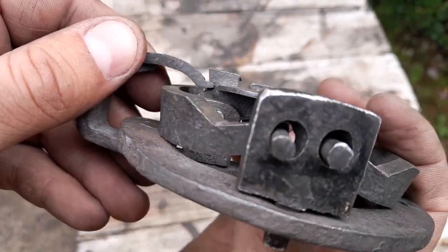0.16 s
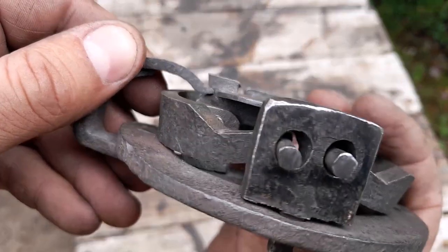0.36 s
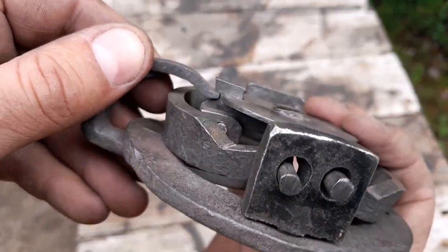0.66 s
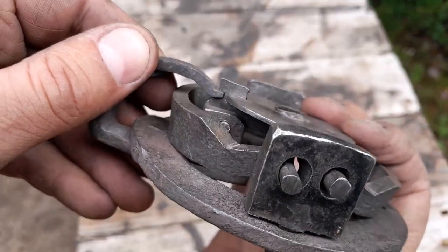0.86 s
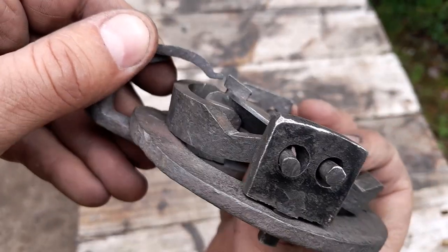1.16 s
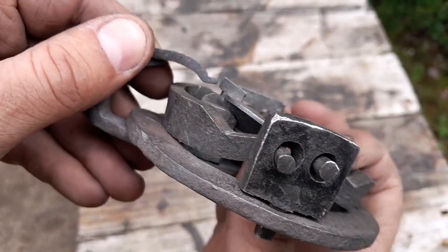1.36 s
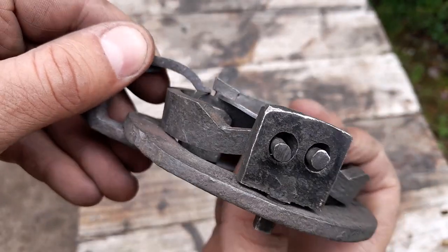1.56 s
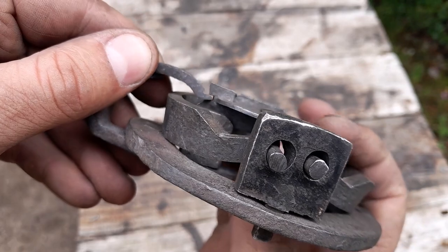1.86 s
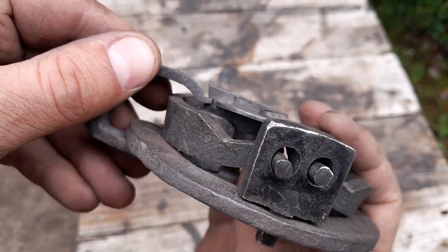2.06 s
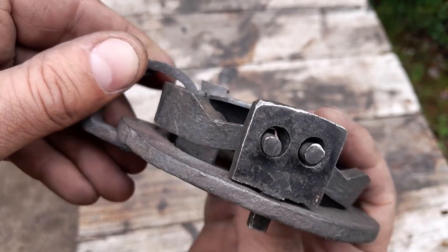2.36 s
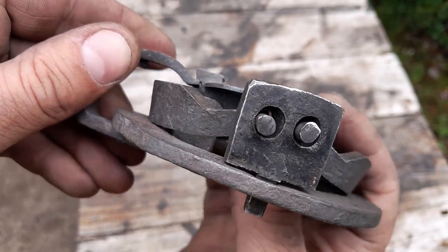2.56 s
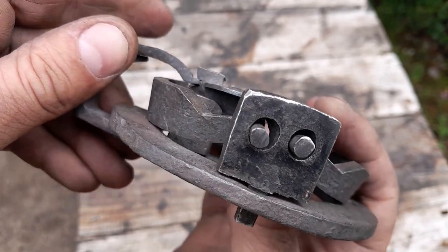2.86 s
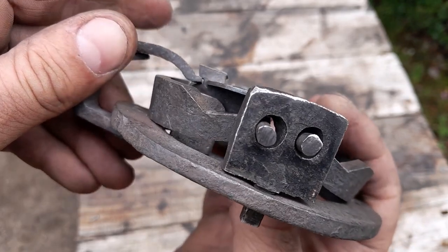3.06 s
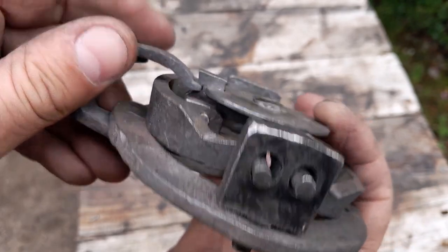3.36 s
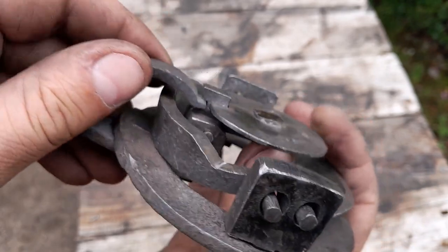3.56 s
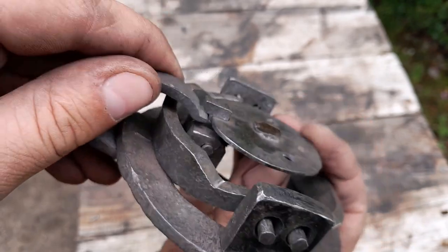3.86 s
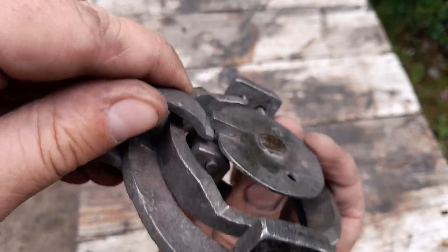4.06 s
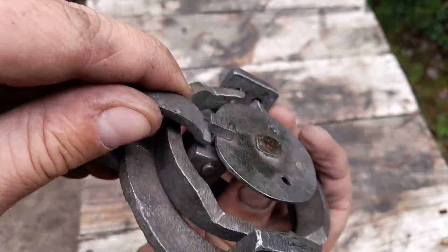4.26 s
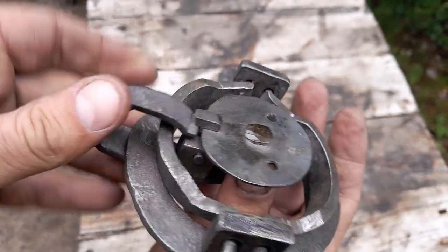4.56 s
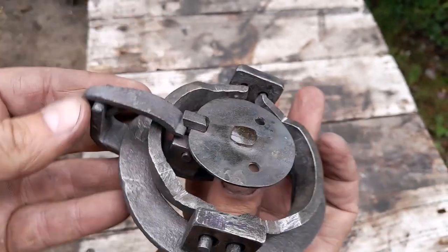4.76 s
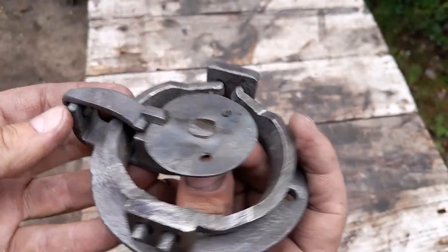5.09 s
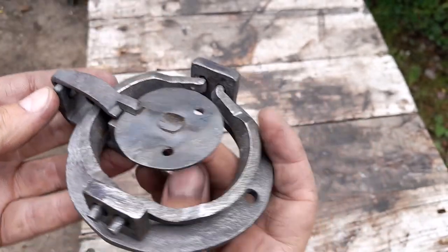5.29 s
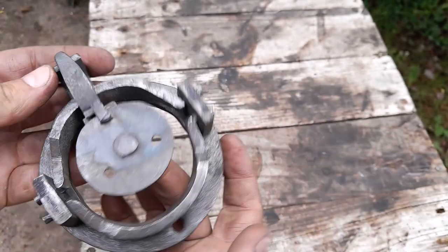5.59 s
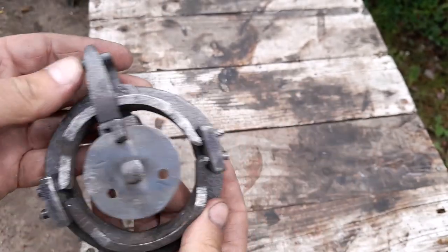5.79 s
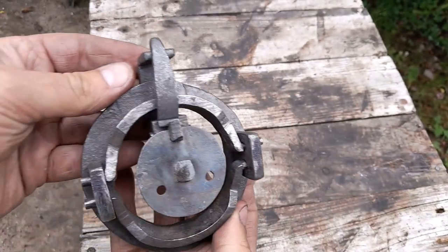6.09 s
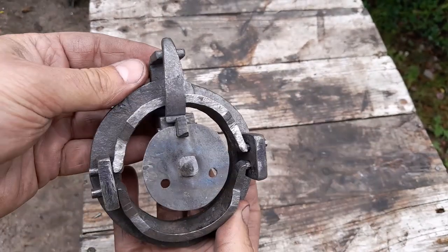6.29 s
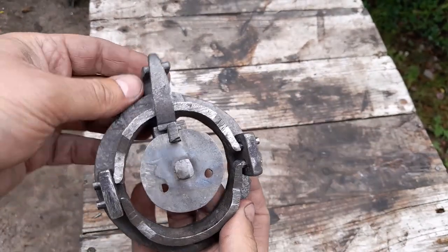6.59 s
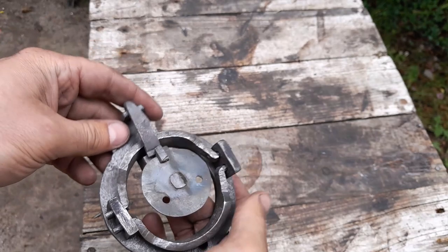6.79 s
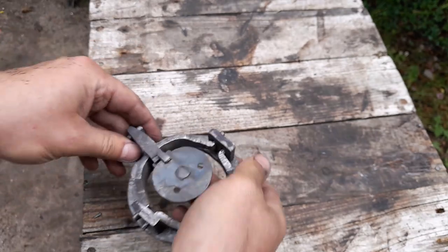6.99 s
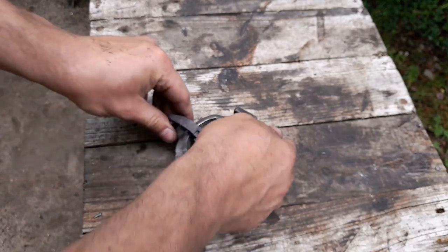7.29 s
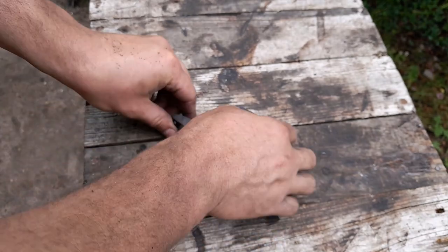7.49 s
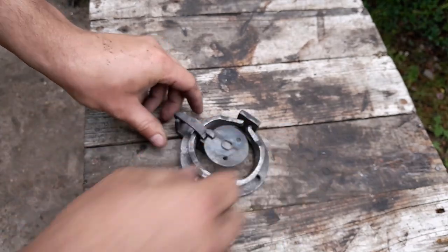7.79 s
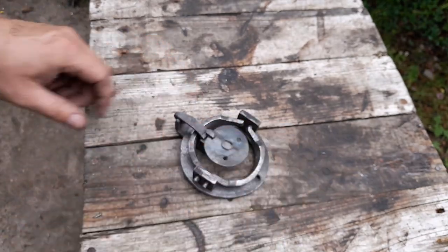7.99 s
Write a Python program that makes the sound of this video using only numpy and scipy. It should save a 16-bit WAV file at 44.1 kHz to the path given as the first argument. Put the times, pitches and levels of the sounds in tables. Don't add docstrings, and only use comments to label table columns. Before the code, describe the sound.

A quiet outdoor place with low distant traffic rumble and soft air, recorded close in stereo. Faint fluty thrush notes and far whistles occupy the first three seconds. At 1.0 s a short piercing hinge squeak at about 8 kHz comes with ticks, then light steel clicks to 1.3 s; thinner squeaks glide at 1.65, 1.77 and 1.9 s. At 2.49 s a jaw snaps hard, bright and very short. Small clicks follow around 3.6 and 3.95 s while a warbler chirps rapidly from 3.4 to 6.5 s. A hard, rattling plate blow hits at 4.92 s, and the loudest latch clack at 5.2 s. A weaker double click comes at 5.7 s. The thrush returns about 6.9 s. From 7.15 s an airy rush swells, peaking near 7.55 s as the steel lands, ringing, with low wooden thumps at 7.56 and 7.65 s and a last knock at 7.84 s.

```python
import sys
import numpy as np
from scipy import signal
from scipy.fft import rfft, irfft, next_fast_len
from scipy.io import wavfile
from scipy.ndimage import uniform_filter1d

SR = 44100
rng = np.random.default_rng(int(sys.argv[2]) if len(sys.argv) > 2 else 0)


def store_pcm(level_fs):
    pcm = np.round(np.clip(level_fs, -1, 1) * 32767).astype(np.int16)
    wavfile.write(sys.argv[1], SR, np.atleast_2d(pcm).T)


def volts_from_decibels(level):
    exponent = np.asarray(level, float) / 20
    return 10 ** exponent


N = 358974

PORT_LAG = 5
LEAD_RAD = 1.3


def unit(x):
    return x / np.sqrt(np.mean(x ** 2))


def band(x, lo_hz, hi_hz):
    return signal.sosfilt(signal.butter(2, [lo_hz, min(hi_hz, .45 * SR)], "band", fs=SR, output="sos"), x)


def add(out, x, s, pan_db, lag=PORT_LAG):
    for ch, side in enumerate((1, -1)):
        i = int(s * SR) + (1 - ch) * lag
        part = np.atleast_2d(x)[-ch, :N - i]
        out[ch, i:i + len(part)] += part * volts_from_decibels(side * pan_db / 2)


def echo(x, t60):
    t = np.arange(int(t60 * SR)) / SR
    tail = rng.standard_normal((2, len(t))) * volts_from_decibels(-60 * t / t60) * np.minimum(t / 0.0084, 1)
    tail = tail / np.sqrt(np.sum(tail ** 2, axis=1, keepdims=True))
    return signal.fftconvolve(x[None], tail, axes=1)[:, :N]


def walk(rate):
    hold = int(SR / rate)
    levels = np.repeat(rng.standard_normal(N // hold + 1), hold)
    return 1.3 * uniform_filter1d(levels, hold)[:N]


def ring(modes, length, scatter_db, chance, spread, lead=0):
    hz, db, t60 = np.transpose(modes)[:, :, None]
    strike, detune, turn = chance[:, :len(hz), None]
    t = np.arange(int(.25 * SR)) / SR
    gain = volts_from_decibels(db + scatter_db * strike - 60 * t / (t60 * np.clip(length, .1, 4)))
    wave = gain * np.exp(2j * np.pi * hz * (1 + 0.00054 * detune) * t)
    turned = wave * np.exp(1j * (lead + spread * turn))
    return np.array([wave.sum(axis=0), turned.sum(axis=0)]).imag


def tone(rows, octave_db=-52):
    s, hz, db = np.transpose(rows)[:3]
    t = np.arange(s[0], s[-1], 1 / SR)
    phase = 2 * np.pi * np.cumsum(np.interp(t, s, hz)) / SR
    edge = np.clip(np.minimum(t - s[0], s[-1] - t) / 0.00056, 0, 1)
    wave = np.sin(phase) + volts_from_decibels(octave_db) * np.sin(2 * phase)
    return np.sqrt(2) * edge * volts_from_decibels(np.interp(t, s, db)) * wave


def clicks(out, hits, modes, spot_db, crack_db, crack_s, rattle_s, rattle, spot_t60=0.034, tops_hz=None,
           spread=2.0, lead=0, damp_s=1):
    hard_db, hard_slope = -20, 0.81
    t = np.arange(int(.25 * SR)) / SR
    for k, (s, peak_db, spot_hz, pan_db, length) in enumerate(hits):
        chance = rng.standard_normal((3, 16))
        noise = rng.standard_normal((2, len(t)))
        struck = list(modes) + [(spot_hz, spot_db, spot_t60)]
        body = ring(struck, length, 1.5, chance, spread, lead) * (1 - np.exp(-t / 0.00025))
        decay = np.exp(-t / crack_s) + rattle * np.exp(-t / (rattle_s * length))
        crack = band((noise[0] + 1.4 * noise) * decay, 2600, 11000)
        crack = band(crack, 1100, tops_hz[k] if tops_hz else 20000)
        share = volts_from_decibels(crack_db - hard_slope * max(peak_db - hard_db, 0))
        hit = body / np.abs(body).max() + share * crack / np.abs(crack).max()
        level = volts_from_decibels(peak_db - 2200 * np.maximum(t - damp_s, 0))
        add(out, level * hit, s, pan_db, lag=0 if lead else PORT_LAG)



def jaws(out):
    jaw_modes = [(4650, -15, 0.028), (5860, 3, 0.033), (7290, -13.5, 0.0557), (7900, -11.5, 0.064),
                 (8340, -4.5, 0.075), (8600, -11, 0.0336), (8750, -24, 0.044), (10300, -26.5, 0.077),
                 (11850, -9.5, 0.087), (13500, -21.5, 0.047), (14300, -7.5, 0.077), (15150, -16, 0.083)]
    jaw_hits = [
        (1.199, -32.5, 4340, 5.5, 0.73),
        (2.3093, -54, 6800, 1.5, 1.5),
        (2.4109, -47.5, 8500, 6.5, 0.93),
        (2.557, -41, 8400, 2.5, 0.66),
        (4.897, -41.5, 8170, 15, 0.97),
        (4.907, -35, 8600, -11, 0.35),
    ]
    snap_modes = [(2740, -28.5, 0.04), (4310, -28, 0.036), (6130, -3, .036), (7700, -9.5, 0.02),
                  (8250, 1.5, 0.053), (9100, -11.5, 0.055), (9780, -10.5, 0.043), (10350, -16.5, 0.026),
                  (11830, -26, 0.052), (14370, 0.5, .045), (15480, -19, .065)]
    snap_hits = [
        (2.485, -10, 8400, 8, .9),
    ]
    clicks(out, jaw_hits, jaw_modes, spot_db=2.0, crack_db=3.5, crack_s=0.0035, rattle_s=.01, rattle=.15)
    clicks(out, snap_hits, snap_modes, spot_db=-8.0, crack_db=1.5, crack_s=0.002, rattle_s=0.013,
           rattle=0.16, spread=0.55, lead=LEAD_RAD)


def pan(out):
    pan_modes = [(2191, -23, .06), (3340, -28, .09), (3900, -9, .02), (6105, -13, .04), (7320, -7, .03),
                 (8250, -5, .05), (8645, -2, .035), (9430, -9, .07), (11720, -9, .06), (13370, -4, .04),
                 (13830, -6, .045), (15460, -13, .07), (10310, -10, .3), (14230, -13, .2)]
    pan_hits = [
        (4.923, -12.5, 7900, 4.9, 0.73),
    ]
    pan_rattles = [
        (4.9275, -25, 4667, 4, 1),
        (4.9335, -32, 6110, 4, .8),
        (4.936, -31, 9430, 4, 1),
        (2.4925, -27, 11830, 8, 1),
        (5.209, -33, 13190, 7, 1),
        (3.564, -53, 8280, 8, 1),
        (4.4605, -54, 8000, -2, 1),
        (7.563, -37, 4667, 3, 1),
    ]
    clicks(out, pan_hits, pan_modes, spot_db=2.5, crack_db=4.0, crack_s=.002, rattle_s=0.022, rattle=0.4,
           spot_t60=0.04, spread=0.47, lead=LEAD_RAD)
    clicks(out, pan_rattles, [], spot_db=.1, crack_db=-14, crack_s=.002, rattle_s=.01, rattle=.3,
           spot_t60=.06, spread=.3, lead=LEAD_RAD)


def latch(out):
    latch_modes = [(4450, -4, 0.022), (6800, -3, 0.028), (7935, .1, 0.03), (9744, -11, .04),
                   (11820, -20, .04), (13190, -10, .035), (14810, -11, .035), (2780, -27, .03)]
    latch_hits = [
        (4.4897, -42, 7940, -2, .8),
        (4.5783, -36, 4610, -2, .6),
        (5.2047, -7, 7300, 7.5, .8),
    ]
    clicks(out, latch_hits, latch_modes, spot_db=-13.0, crack_db=3.0, crack_s=0.0013, rattle_s=0.006, rattle=0.25)


def catch(out):
    catch_modes = [(2820, -20, .1), (4490, -9, .1), (5670, -12, .03), (7924, .1, .2), (8540, -14, .1),
                   (9685, -10, .06), (11670, -3, .12), (13160, -2, .1), (14790, -9, .06)]
    catch_hits = [
        (3.9535, -31, 9690, 2.1, .3),
        (5.696, -32.5, 7070, 5.7, 1.4),
        (5.7122, -37.5, 4280, 4.2, 0.47),
    ]
    clicks(out, catch_hits, catch_modes, spot_db=-4.0, crack_db=1, crack_s=0.0016, rattle_s=0.026,
           rattle=0.25, spot_t60=0.027, damp_s=.023)


def lever(out):
    lever_modes = [(4686, 0, 0.015), (6170, 3, 0.013), (8305, 2.5, 0.063), (10320, -14, 0.08),
                   (11770, -3.5, 0.068), (14330, -4, 0.055), (16300, -20, 0.067)]
    lever_hits = [
        (1.0975, -36, 8260, 9, 0.8),
        (1.1349, -26.5, 5860, 4, 0.52),
        (1.135, -37, 10560, 6, 2.1),
        (1.3273, -43, 8340, 6.3, 1.7),
        (2.329, -48.5, 14300, 5.3, 1.8),
        (3.6256, -29, 8200, 8.5, 1.56),
    ]
    clicks(out, lever_hits, lever_modes, spot_db=4.0, crack_db=-7.0, crack_s=0.0069, rattle_s=0.01, rattle=0.17)


def base(out):
    base_modes = [(2800, -17, .03), (4667, -8, .1), (6000, -9, .05), (7030, -9, .04), (7348, -9, .05),
                  (8215, -5, .05), (8570, -1, .06), (9400, -11, .05), (10305, -9, .25), (11720, -9, .15),
                  (14180, -2, .13), (15490, -11, .08)]
    base_hits = [
        (7.4882, -33, 10305, 3.2, 0.53),
        (7.5605, -25, 4667, 1.9, 1),
        (7.656, -26, 7500, 2.5, 0.36),
    ]
    # t/s, t60/s, level/dB
    settles = [
        (7.558, 0.25, -38),
        (7.656, 0.14, -38),
    ]
    clicks(out, base_hits, base_modes, spot_db=-12.0, crack_db=1.5, crack_s=0.0011, rattle_s=0.018,
           rattle=0.27, spot_t60=0.16, spread=0.78, lead=LEAD_RAD)
    t = np.arange(SR // 4) / SR
    for s, t60, db in settles:
        grit = rng.standard_normal((2, len(t))) * volts_from_decibels(db - 60 * t / t60)
        add(out, band(grit, 640, 9500), s, 3)


def ticks(out):
    # t/s, peak level/dB, f/Hz, left minus right level/dB, top of the crack f/Hz
    light_ticks = [(0.688, -58, 8000, -5, 8000), (0.9954, -55.5, 3380, 26, 7100),
                   (1.0084, -40, 3250, 3, 6040), (1.0933, -54, 8320, 9, 12900),
                   (1.1142, -46, 2980, 3, 6960), (1.6132, -39.5, 7000, 3.5, 9900),
                   (1.622, -42, 7900, -10, 7450), (3.6167, -44.5, 7700, -3.5, 8450),
                   (3.748, -62, 8250, 4, 8800), (3.8986, -50.5, 10000, 6.5, 8950),
                   (4.008, -56.5, 6400, 3, 12000), (4.1454, -44, 3790, -0.5, 7900),
                   (4.46, -54.5, 7740, -4, 9260), (4.576, -45.5, 4580, -6, 9000),
                   (5.957, -65.5, 8300, 1, 12000), (6.227, -44, 4330, 3.5, 7100),
                   (7.6463, -46.5, 7000, 2.5, 8000)]
    hits = [(*row[:-1], 0.68) for row in light_ticks]
    tops_hz = [row[-1] for row in light_ticks]
    clicks(out, hits, [], tops_hz=tops_hz, spot_db=.1, crack_db=10.5, crack_s=0.000414, rattle_s=0.017, rattle=0.2)


def squeaks(out):
    # t/s, f/Hz, level/dB
    hinge_squeaks = [
        [(.995, 8000, -54), (.999, 7920, -38), (1.0035, 7880, -17.5), (1.006, 7870, -18.5), (1.013, 7868, -33),
         (1.019, 7868, -50), (1.06, 7890, -72)],
        [(1.647, 7150, -64), (1.653, 7160, -42), (1.664, 7190, -36), (1.675, 7205, -40), (1.685, 7220, -50),
         (1.7, 7237, -66), (1.73, 7240, -80)],
        [(1.753, 7400, -64), (1.762, 7300, -46), (1.7645, 7250, -60), (1.7695, 7120, -32), (1.783, 7060, -28),
         (1.791, 7030, -32), (1.8, 7030, -45), (1.812, 7050, -60), (1.85, 7060, -80)],
        [(1.913, 7100, -75), (1.919, 6820, -45), (1.923, 6820, -52), (1.927, 6820, -76)],
    ]
    octaves_db = (-30, -16, -17, -32)
    for rows, pan_db, octave_db in zip(hinge_squeaks, (8.5, -1.0, 3.5, 13.0), octaves_db):
        add(out, tone(rows, octave_db), rows[0][0], pan_db)


def rubs(out):
    # t/s, length/s, level/dB, top f/Hz
    finger_rubs = [
        (5.36, .06, -57, 14000),
        (2.31, .045, -62, 10000),
        (4.46, .05, -63, 14000),
        (1.762, .05, -56, 7500),
        (.99, .03, -49, 13000),
        (1.785, .06, -58, 6000),
        (7.638, .016, -48, 8000),
        (1.91, .025, -60, 14000),
        (1.648, .03, -58, 8000),
    ]
    for s, length, db, top_hz in finger_rubs:
        grit = rng.standard_normal(SR // 2)[:int(length * SR)]
        add(out, volts_from_decibels(db) * band(grit * np.hanning(len(grit)), 1100, top_hz), s, 3)


def knocks(out):
    # f/Hz, level/dB, t60/s
    plank_modes = [(117, -18, 0.4), (156, -7.5, 0.088), (200, -6.5, 0.04), (322, -0.5, 0.021),
                   (352.5, 1.5, .07), (523, -1, 0.045), (688, -3, 0.067), (875, -5, 0.049),
                   (1075, 0.5, 0.04), (1428, -18, 0.02)]
    # t/s, peak level/dB, push/ms, ring length factor, level of the low modes/dB
    thumps = [
        (4.9228, -42, 0.62, 0.29, -12),
        (2.486, -34, 0.49, 0.2, 8),
        (5.2053, -31.5, .2, 0.084, 0),
        (7.5564, -19, 1.07, 0.91, 14.5),
        (7.581, -28, 4.8, 0.79, -27),
        (7.6489, -21.5, 1.22, 0.27, -21),
        (7.6546, -24, 2.1, 1, 4.5),
        (7.6745, -27, 1.7, 0.81, -4),
        (7.8415, -26, 1.66, 0.6, -9),
    ]
    boom_hz, rise_s, thud_db, thud_s = 260, 0.00069, 1.5, 0.039
    for s, peak_db, push_ms, length, boom_db in thumps:
        push = np.hanning(int(np.clip(push_ms, .2, 8) * SR / 1000))
        wood = [(hz, db + boom_db * (hz < boom_hz), t60) for hz, db, t60 in plank_modes]
        knock = ring(wood, length, 3, rng.standard_normal((3, 16)), spread=0)[0]
        t = np.arange(len(knock)) / SR
        knock += volts_from_decibels(thud_db) * rng.standard_normal(len(t)) * np.exp(-t / (thud_s * length))
        knock = np.convolve(-knock * (1 - np.exp(-t / rise_s)), push)
        knock = band(knock, 110, 2300)
        add(out, volts_from_decibels(peak_db) * knock / np.abs(knock).max(), s, 3.5)


def trap():
    out = np.zeros((2, N))
    for part in (jaws, pan, latch, catch, lever, base, ticks, squeaks, rubs, knocks):
        part(out)
    shade = 0.026
    out[1] = signal.lfilter([1 - shade], [1, -shade], out[1])
    near_t60_s, near_db = 0.18, -22.5
    return out + volts_from_decibels(near_db) * echo(band(out.mean(axis=0), 1200, 22000), near_t60_s)


def sweep():
    # t/s, level/dB
    sweep_level = [(7.12, -96), (7.141, -86), (7.3, -75.5), (7.5, -67), (7.57, -75), (7.7, -91),
                   (7.9, -67.5), (8.05, -70), (8.14, -70)]
    sweep_hz = (2825, 9500)
    db = np.interp(np.arange(N) / SR, *np.transpose(sweep_level)) + 1.8 * walk(30)
    return volts_from_decibels(db) * unit(band(rng.standard_normal((2, N)), *sweep_hz))


def thrush():
    # t/s, length/s, f/Hz, level/dB
    held = [(.85, .03, 2280, -66), (.86, .09, 1830, -72), (1.03, .08, 2150, -75), (1.135, .02, 2520, -64),
            (1.165, .05, 2560, -62), (1.51, .02, 1850, -66), (1.63, .065, 2330, -67),
            (1.715, .05, 2360, -71), (1.74, .06, 1850, -71), (1.82, .03, 2480, -68), (2.05, .12, 2270, -70),
            (2.62, .04, 2160, -71), (1.38, .03, 1830, -68), (6.905, .035, 2250, -65),
            (6.96, .045, 2250, -63), (7.05, .055, 2230, -69), (7.14, .095, 2330, -61),
            (7.24, .09, 2250, -68), (7.8, .1, 1920, -69)]
    # t/s, length/s, first f/Hz, aim f/Hz, level/dB
    glides = [(1.215, .033, 2450, 1700, -66), (1.325, .025, 1450, 1880, -65),
              (1.415, .025, 1950, 1500, -63), (1.47, .125, 2200, 2350, -62), (1.59, .035, 2080, 1750, -69),
              (2.3, .055, 2350, 2250, -66), (2.515, .09, 1850, 2250, -64), (7.005, .07, 2150, 1800, -66),
              (2.612, .12, 2430, 2510, -66), (2.72, .04, 2130, 2400, -70), (7.42, .14, 1520, 2000, -64),
              (7.67, .12, 1850, 1960, -61)]
    scoops = [
        (.705, .14, 2570, 2280, -63),
        (7.79, .07, 2000, 2640, -62),
        (7.945, .05, 1850, 2350, -62),
        (8.02, .115, 1850, 2330, -62),
    ]
    dips = [
        (.48, .125, 1880, 1770, -68),
        (1.352, .04, 1880, 1600, -66),
        (1.535, .045, 1900, 1580, -68),
    ]
    notes = [(s, length, hz, length / 2, hz, hz, db) for s, length, hz, db in held]
    notes += [(s, length, first, length / 2, (first + aim) / 2, aim, db) for s, length, first, aim, db in glides]
    notes += [(s, length, first, .033, aim, aim, db) for s, length, first, aim, db in scoops]
    notes += [(s, length, first, length / 2, aim, first, db) for s, length, first, aim, db in dips]
    out = np.zeros((2, N))
    for s, length, first, turn_s, turn, last, db in notes:
        add(out, tone([(0, first, db - 2), (turn_s, turn, db + 5.5), (length, last, db - 2)]), s, 3)
    return out * volts_from_decibels(.2)


def warbler():
    # t/s, f/Hz, level/dB
    chiff = [(0, 7100, -7), (.005, 6200, 2), (.011, 5200, 1), (.019, 4680, -1), (.05, 4600, 1),
             (.072, 4560, -3), (.085, 3800, -9), (.11, 3300, -16)]
    chaff = [(0, 7300, -8), (.01, 6200, 1), (.02, 5400, -2), (.04, 5250, 1), (.047, 4900, -7),
             (.06, 4100, -7), (.075, 3620, -8), (.098, 3520, -12), (.105, 3480, -20)]
    chup = [(0, 7000, -5.5), (.012, 5200, -12.5), (.024, 3900, -5.5), (.07, 3800, -8), (.09, 3750, -18.5)]
    churr = [(0, 3800, -3), (.006, 4600, 2), (.01, 5400, -9), (.016, 6300, -1), (.021, 7000, -7),
             (.027, 8200, -9)]
    # t/s, pitch factor, level/dB
    chiffs = [
        (0.071, 1.06, -74),
        (0.757, 1.01, -75),
        (3.42, 1.02, -69),
        (4.398, 1.005, -63),
        (5.055, 1.01, -62),
        (6.041, 1.005, -64),
    ]
    chaffs = [
        (3.752, 1.02, -65),
        (4.077, 1, -68),
        (4.744, 1.02, -64),
        (5.406, 1.01, -66),
        (5.725, .995, -63),
        (6.387, 1.02, -67),
        (7.904, 0.8, -75),
    ]
    chups = [
        (0.402, 1.014, -71),
    ]
    # t/s, level/dB
    churrs = [(2.876, 2), (2.892, 3), (2.924, -4), (2.954, 2), (2.968, 0), (2.982, -1), (3.12, -2),
              (3.139, -3), (3.155, -5), (3.212, -4), (3.226, -5)]
    out = np.zeros((2, N))
    for shape, notes in ((chiff, chiffs), (chaff, chaffs), (chup, chups)):
        for s, pitch, db in notes:
            add(out, volts_from_decibels(db) * tone(np.array(shape) * [1, pitch, 1]), s, -1.1, lag=1)
    for s, db in churrs:
        add(out, volts_from_decibels(db - 72) * tone(churr), s, -1.1, lag=1)
    return out


def far_birds():
    # t/s, length/s, f/Hz, level/dB
    whistles = [(1.47, .15, 4370, -73), (1.93, .11, 5950, -73), (2.03, .28, 3050, -77),
                (2.1, .06, 4400, -74), (.035, .035, 2050, -75), (.165, .02, 2030, -73),
                (.355, .045, 2070, -75), (.42, .08, 2050, -76), (.64, .06, 1850, -74),
                (.89, .09, 2900, -78), (3.15, .1, 1980, -77), (3.3, .1, 2080, -77), (2.35, .13, 5950, -71),
                (2.52, .15, 3030, -77), (3.28, .22, 2330, -79), (1.25, .65, 298, -68)]
    out = np.zeros((2, N))
    for s, length, hz, db in whistles:
        add(out, tone([(0, hz, db - 3), (length / 2, hz, db), (length, hz, db - 4)]), s, 1, lag=0)
    start_s, end_s, lo_hz, hi_hz = 1.15, 1.8, 1600, 3200
    length_s, twitter_db = .03, -73
    for when, pitch, slide in rng.random(size=(60, 3)):
        hz = lo_hz + pitch * (hi_hz - lo_hz)
        note = tone([(0, hz, twitter_db), (length_s, hz * (.8 + .4 * slide), twitter_db)])
        add(out, note, start_s + when * (end_s - start_s), 1.1)
    return out


def birds():
    waver = .00014 * SR
    n = np.arange(N)
    path = n + waver * walk(40)
    song = np.array([np.interp(path, n, port) for port in thrush()])
    far = np.array([np.interp(path, n, port) for port in far_birds()])
    near = warbler() * volts_from_decibels(2.5 * walk(150))
    far = far * volts_from_decibels(3 * walk(60) - 1.5)
    mono = (near + volts_from_decibels(-8) * (far + song)).mean(axis=0) * volts_from_decibels(2 * walk(120))
    mono = np.interp(n + waver * walk(75), n, mono)
    bushes = volts_from_decibels(8.5) * echo(mono, 0.3)
    trees = volts_from_decibels(0.5) * echo(mono, .9)
    return near + far + volts_from_decibels(1.798 * walk(50)) * song + bushes + trees


def outdoors():
    # f/Hz, level per Hz/dB
    spectrum = [(20, -35), (34, -24), (52, 6), (80, -4.5), (115, -1.5), (180, -7), (300, -13), (700, -13),
                (1500, -16.5), (2200, -22), (2800, -28.5), (5000, -29), (8600, -34.5), (16000, -41)]
    # f/Hz, coherence (0-1)
    likeness = [(60, 1), (130, 0.9), (290, 0.8), (640, 0.1), (1400, 0.04)]
    # f/Hz, left minus right level/dB
    lean_curve = [(60, -2), (250, 4), (1300, 3), (4400, 2), (15000, 2)]
    # t/s, level/dB
    traffic = [(0, 4.5), (.6, 3), (1.74, 7), (1.88, 1.5), (2.93, 5), (3.3, 1), (4.3, 5), (4.8, 1.5),
               (5.9, -0.5), (7.3, 1), (8.14, 5.5)]
    # t/s, level/dB
    breeze = [(0, -4), (1.501, 0), (1.9, -2.5), (4.3, -5.5), (4.898, 0.5), (6.5, -3.5), (7.1, -2.1),
              (7.139, 1.5), (7.55, 12.5), (7.8, 2), (8.14, 3)]

    def read(table, hz):
        table_hz, value = np.transpose(table)
        return np.interp(np.log(hz), np.log(table_hz), value)

    rumble, rush = (np.interp(np.arange(N) / SR, *np.transpose(curve)) for curve in (traffic, breeze))
    hum = .45 * rush
    size = next_fast_len(N, real=True)
    f = np.fft.rfftfreq(size, 1 / SR) + 1
    opposite = np.array([[1], [-1]])
    out = np.zeros((2, N))
    for hz in 22 * 2 ** (np.arange(20) / 2):
        shape = volts_from_decibels(read(spectrum, f)) * np.cos(np.pi / 2 * np.clip(2 * np.log2(f / hz), -1, 1))
        mid, side = irfft(rfft(rng.standard_normal((2, size))) * shape, size)[:, :N]
        alike = np.clip(read(likeness, hz), 0, .98)
        low = np.clip(np.log2(400 / hz), 0, 1)
        high = np.clip(np.log2(hz / 1500), 0, 1)
        db = low * (rumble + 0.33 * walk(6)) + high * rush + (1 - low - high) * hum + 1.4 * walk(12)
        lean = volts_from_decibels(opposite / 2 * read(lean_curve, hz))
        out += volts_from_decibels(db) * lean * (np.sqrt(1 + alike) * mid + np.sqrt(1 - alike) * side * opposite)
    return unit(out) * volts_from_decibels(-55.5)


def scene():
    return trap() + sweep() + birds() + outdoors()


def band_limit(x):
    return signal.sosfilt(signal.butter(12, 16830, fs=SR, output="sos"), x)


def record(dry):
    low_pass = signal.ellip(8, .2, 60, 15650, fs=SR, output="sos")
    mix = signal.sosfilt(low_pass, dry)
    return band_limit(mix)


dry = scene()
out = record(dry)
store_pcm(out)
```